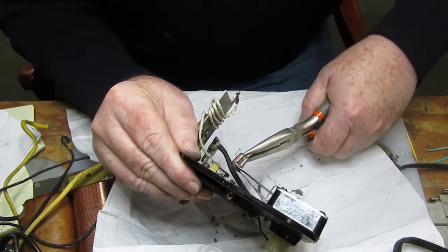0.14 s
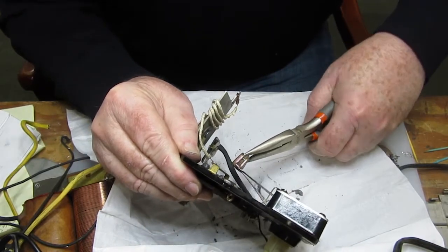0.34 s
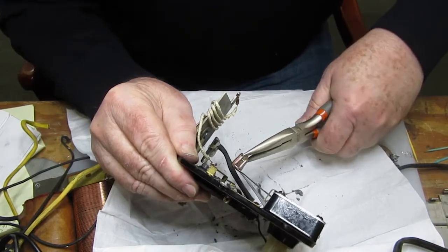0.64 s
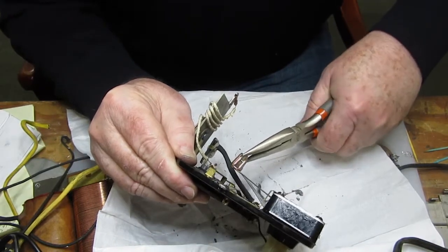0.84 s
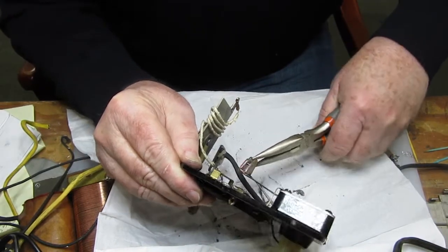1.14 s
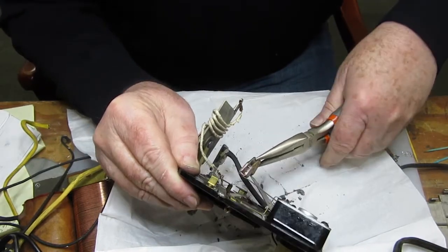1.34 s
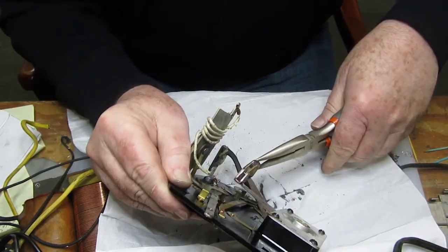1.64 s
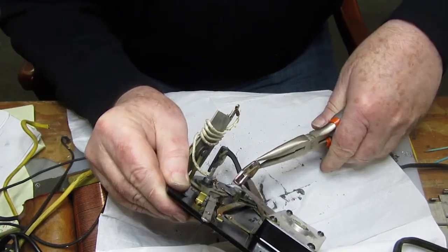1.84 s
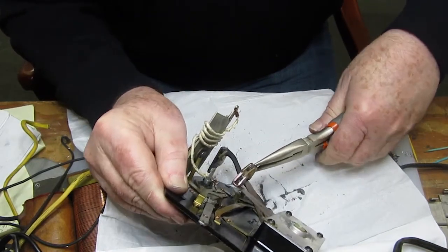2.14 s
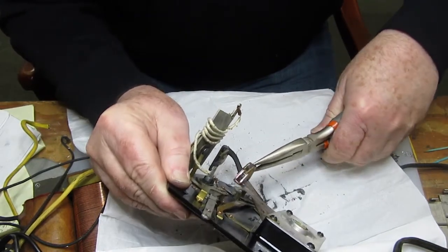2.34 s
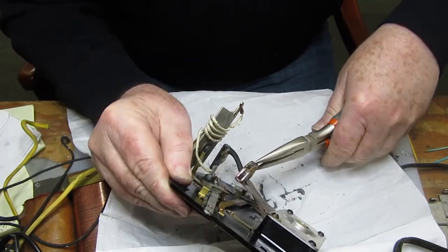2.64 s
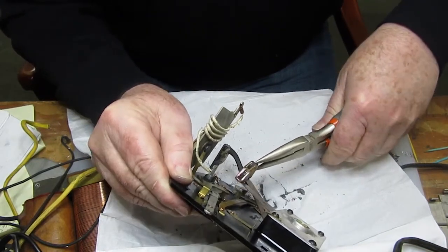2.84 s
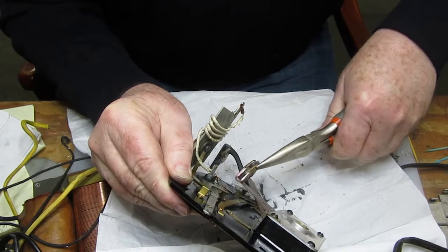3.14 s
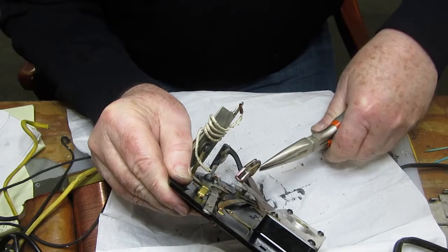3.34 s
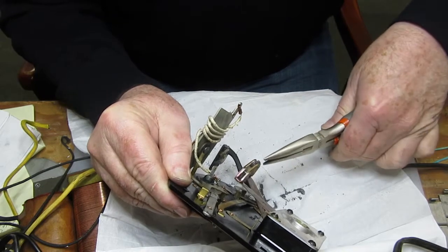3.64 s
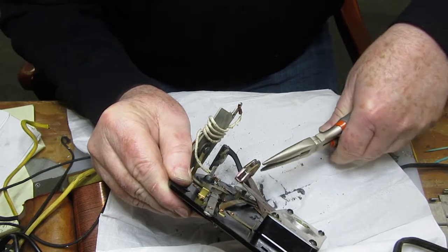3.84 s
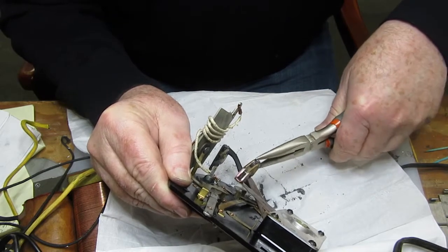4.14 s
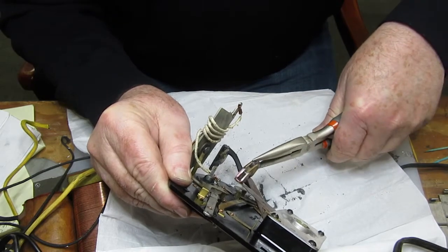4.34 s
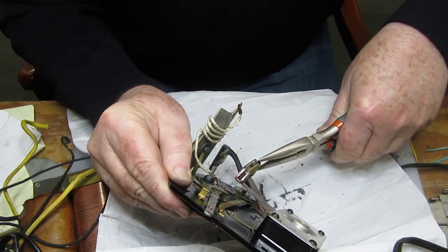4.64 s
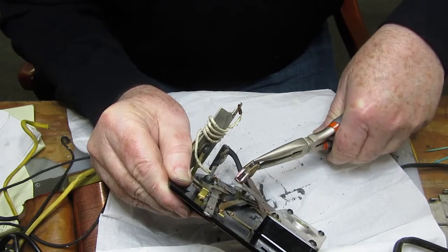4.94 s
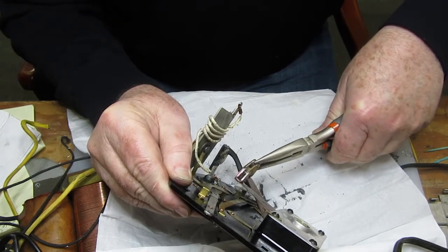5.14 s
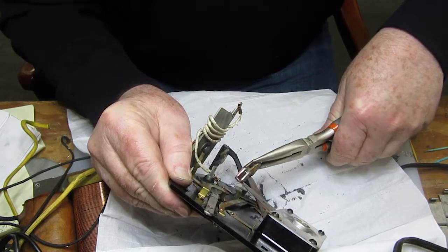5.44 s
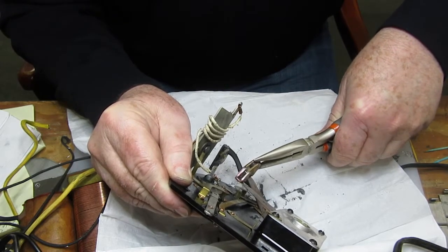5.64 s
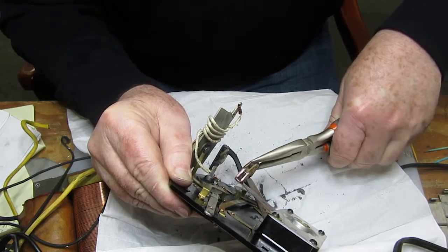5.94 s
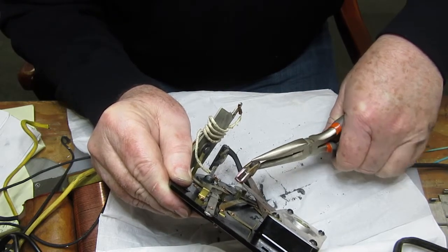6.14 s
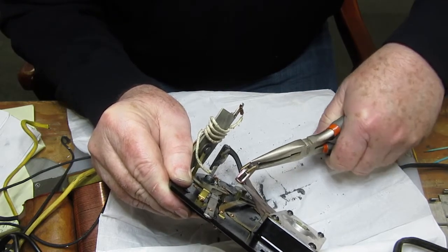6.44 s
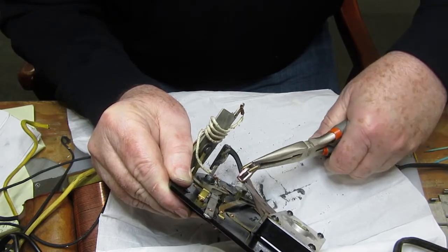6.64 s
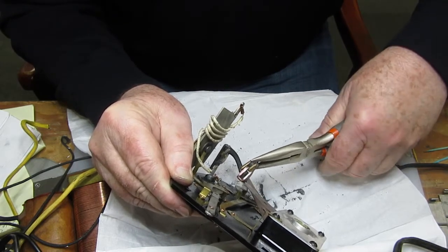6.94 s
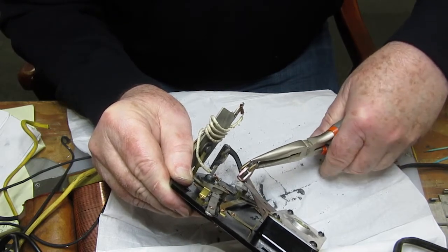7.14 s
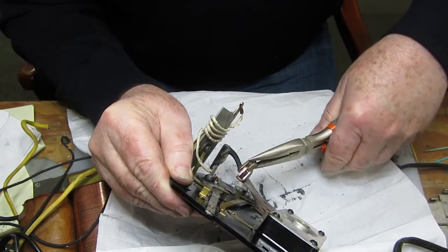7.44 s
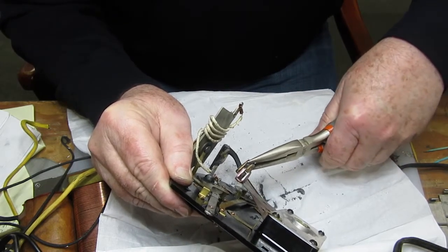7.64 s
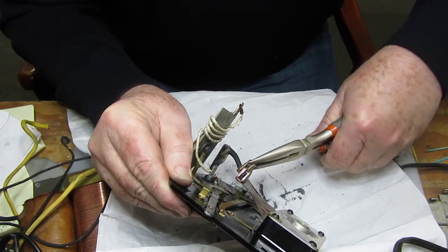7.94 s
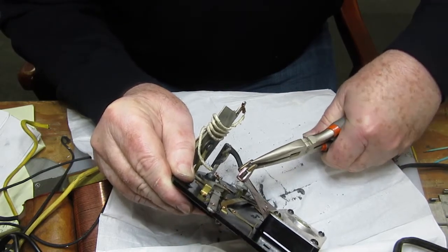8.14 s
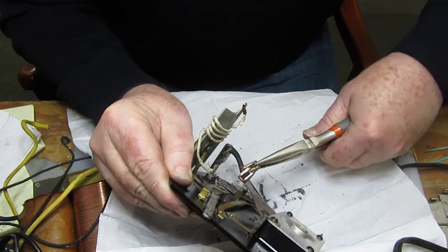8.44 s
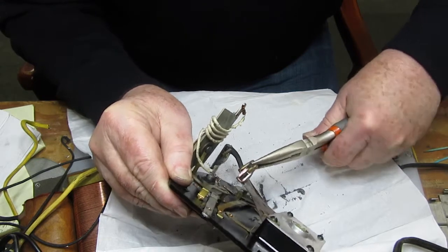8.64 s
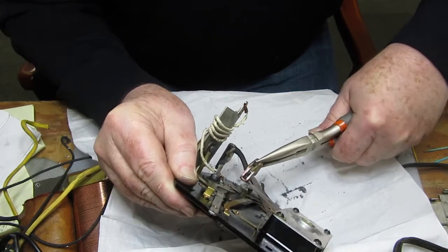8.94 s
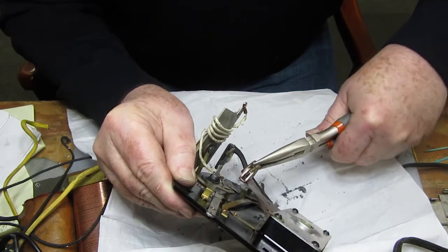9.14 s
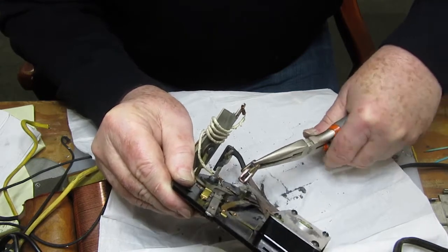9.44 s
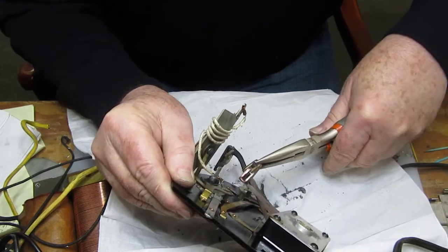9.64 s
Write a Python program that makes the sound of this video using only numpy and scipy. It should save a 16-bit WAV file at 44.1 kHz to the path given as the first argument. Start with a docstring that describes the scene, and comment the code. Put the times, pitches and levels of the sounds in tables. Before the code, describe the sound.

Close up at a workbench in a small room, needle-nose pliers break brittle graphite off a metal assembly with a sharp double crack and a brief metallic ring. The assembly scuffs on paper and the steel jaws click lightly. About three seconds in comes a second sharp snap with a quick run of clicks. Scattered bites, tiny crunches, finger rubs and soft knocks follow over a faint hum.

```python
"""Two sharp snaps, close up: needle-nose pliers crush a brittle graphite piece off a hand-held metal
assembly. Each break cracks and sets the holder, thin parts and a small spring ringing. The steel jaws
click and grind, crumbs tick, fingers rub, and the chassis knocks and scuffs on the workbench paper.
A faint hum fills the small room; the microphone overloads on the snaps and its gain control ducks."""
import sys
import numpy as np
from scipy import signal
from scipy.fft import rfft, irfft
from scipy.io import wavfile

SR = 44100
rng = np.random.default_rng(int(sys.argv[2]) if len(sys.argv) > 2 else 0)


def generate_wav(sig):
    """Save sig (samples, or channels by samples) to the path in sys.argv[1] as 16-bit PCM at SR."""
    pcm = np.round(np.clip(np.atleast_2d(sig).T, -1, 1) * 32767).astype(np.int16)
    wavfile.write(sys.argv[1], SR, pcm)


N = 432180

# The graphite breaking. Each row: start in seconds, level in dB, treble tilt in dB, pitch of the
# released holder in Hz, fade time of the crack in seconds.
BREAKS = [(0.1019, -12, -1, 2720, 0.0017), (0.1225, -11.5, -2, 2400, 0.0021),
          (3.1510, -27, 6, 2200, 0.0071), (3.1567, -13, 14, 2450, 0.0017)]
# The tone of the crack. Each row: frequency in Hz, gain in dB.
CRACK_EQ = [(100, -26.5), (350, -4), (800, -7), (1500, -6.5), (2400, 6), (3100, 3), (3450, -4), (4100, 2),
            (4700, -4), (5200, -1), (8000, -7.5), (9300, -4.5), (11000, -13.5), (15000, -17)]
# Thin metal parts ringing on. Each row: frequency in Hz, t60 in seconds, level in dB.
THIN_PART_MODES = [(1880, 0.069, 6), (4050, .12, -6)]
# Steel jaws biting. Each row: start in seconds, level in dB, treble in dB, knock into the chassis in dB,
# delay of a second slip in seconds (0 for none).
JAW_BITES = [(1.5664, -39.5, -9, -56, 0.00042), (1.6246, -35.5, -1, -41, .0137),
             (1.672, -34.5, -4, -56, 0.000044), (1.785, -40, -2.5, -58, .018), (1.932, -29, -1, -46, 0),
             (1.9537, -40.5, 1, -52, 0.00017), (3.1833, -23.5, -1, -38, .0048),
             (3.2105, -28, 1.5, -37, 0.000081), (3.2629, -40, 1, -55, 0.00021), (3.302, -25, 0, -47, .0127),
             (3.3277, -30, -1, -45, .0129), (3.392, -39, 1, -44, 0.001), (4.185, -41, -0.5, -48, 0),
             (5.16, -33, 0.5, -42, .0067), (5.182, -28, -1.5, -39.5, 0.00008), (5.4671, -31, -7, -41, 0),
             (5.4724, -20, -1, -39.5, 0.0018), (6.338, -38, -2.5, -56, .0043),
             (7.7344, -43, -11, -54, 0.00032), (8.397, -39, -9, -46, 0.00034),
             (8.4049, -31, -6.5, -44, 0.00023), (8.4701, -30, -15, -37, 0), (8.7295, -29, -8.5, -51, .0043),
             (8.8033, -30.5, -1, -52, .009), (9.4075, -22.5, -5, -30, .009)]
# The ring of jaws and holder. Each row: frequency in Hz, t60 in seconds, level in dB when gripping at
# the tip, level in dB when gripping deeper.
STEEL_MODES = [(1306, 0.029, -11.5, -10.5), (1530, 0.04, -12.5, -9.5), (1894, 0.045, -15, -15.5),
               (2760, 0.012, -18, -3), (3150, 0.058, -18, -26), (3640, 0.02, 3.5, 1.5), (3924, 0.024, 1, 4),
               (4073, 0.036, -2.5, 4), (4210, 0.03, 0, 5.5), (4510, 0.029, -8.5, -3.5),
               (5290, 0.027, -10, -10), (5850, 0.034, -12, -6.5), (7083, 0.018, 2, -0.5),
               (8020, 0.028, -11.5, -7), (8840, 0.015, -13, -1.5), (9300, 0.013, -2, 1.5),
               (10160, 0.017, -8, -13), (11900, 0.034, -17, -11.5), (12500, 0.023, -33.5, -27)]
# The jaw tips feeling for a grip. Each entry: start in seconds.
TIP_TOUCHES = [1.2012, 1.353, 1.693, 1.815, 4.2888, 5.845, 6.0488, 6.1367, 8.6555]
# Graphite crumbling in the jaws, dull and gritty. Each row: start in seconds, level in dB.
GRAPHITE_CRUMBLES = [(1.626, -44), (1.7437, -55), (1.939, -48.5), (2.667, -48.5), (3.2212, -42.5),
                     (3.239, -47.5), (4.3443, -52.5), (5.1775, -46.5), (5.2301, -48.5), (5.4575, -48),
                     (6.378, -52.5), (6.5021, -45), (6.508, -46), (6.6553, -56.5), (6.6888, -56),
                     (7.812, -49), (8.399, -47), (8.532, -56)]
# Jaws dragging across the graphite. Each row: start in seconds, length in seconds, level in dB.
JAW_DRAGS = [(3.17, 0.023, -31), (6.341, 0.034, -51), (8.829, 0.062, -42)]
# The body of the chassis on the bench. Each row: frequency in Hz, t60 in seconds, level in dB.
CHASSIS_BODY_MODES = [(103.7, 0.22, -0.5), (174.5, 0.2, -7.5), (260.7, .12, -1), (301.4, .09, -3),
                      (401, 0.045, -7.5), (535.4, .1, -10.5), (716, .05, -14.5), (860, 0.027, -14.5)]
# The chassis scuffing on paper. Each row: start in seconds, length in seconds, level in dB.
CHASSIS_SCUFFS = [(1.034, .12, -35), (1.067, .044, -28.5), (1.371, 0.046, -41.5), (1.614, 0.062, -39.5),
                  (3.16, .17, -46), (4.167, 0.24, -54), (8.606, 0.08, -48.5), (8.681, .049, -33),
                  (8.833, 0.066, -26), (9.383, 0.081, -43), (9.695, 0.02, -43.5)]
# The tone of the paper's rasp. Each row: frequency in Hz, gain in dB.
PAPER_EQ = [(200, 8), (700, 3), (1700, 5), (2800, -5), (4400, -4), (6000, -8.5), (12000, -17.5),
            (15000, -29.5)]
# Fingers and jaws shifting their grip. Each row: start in seconds, length in seconds, level in dB.
GRIP_RUBS = [(0.436, 0.095, -56.5), (1.169, .11, -58.5), (1.517, 0.081, -51.5), (3.487, 0.044, -53.5),
             (3.749, 0.073, -59), (6.86, 0.087, -56), (7.602, 0.093, -60), (9.458, .16, -59)]
# The tone of room air and microphone hiss. Each row: frequency in Hz, gain in dB.
AIR_EQ = [(12, -28), (20, -11), (43, -6.5), (87, -15), (124, -1), (147, -11.5), (199, -14), (398, -18),
          (433, -22.5), (525, -19.5), (638, -22.5), (1210, -19.5), (1420, -25.5), (9370, -37), (15000, -48)]
# A distant fan's resonances. Each row: frequency in Hz, t60 in seconds, level in dB.
DISTANT_FAN_MODES = [(410, 1, -8.5), (902, 0.069, 6), (1000, .08, -21), (1240, 0.1, -3), (9500, 0.0065, 4)]
# Brief swells in the mains hum. Each row: time of the peak in seconds, rise in dB.
MAINS_SWELLS = [(3.62, 14), (6.92, 13.5)]
# The fader curve of the low rumble. Each row: time in seconds, level in dB.
RUMBLE_FADER = [(3.8, -60), (5.4, -49), (9.8, -52)]

TOP_HZ = 15300
GRIP_DEEPER_S = 7.0  # from here on the jaws grip deeper


def snaps(swing_s=0.00069, holder_db=-4, thin_db=-20, spring_db=-27, let_go_s=3.392, let_go_db=-35):
    """Each break is a broad crack; the freed holder swings a few cycles; thin parts and spring ring on."""
    out, t = np.zeros(N), seconds(.03)
    thin_parts = hit_level(ring(THIN_PART_MODES, .3))
    for start, db, tilt_db, holder_hz, crack_s in BREAKS:
        crack = colour(fracture(.03, crack_s), CRACK_EQ)
        crack = colour(crack, [(3000, 0), (12000, tilt_db)])
        holder = t * np.exp(-t / swing_s) * np.sin(2 * np.pi * holder_hz * t)
        add(out, start, undb(db) * hit_level(crack))
        add(out, start, undb(db + holder_db) * hit_level(holder))
        add(out, start, undb(db + thin_db) * thin_parts)
        add(out, start, undb(db + spring_db) * spring())
    add(out, let_go_s, undb(let_go_db) * thin_parts)  # they ring freely as the pliers slip off
    return out


def fracture(length, fade_s):
    """A running crack, spread over a moment but evened out in spectrum; a slow one also builds slowly."""
    crackle = burst(length, fade_s, rise_s=.2 * fade_s)
    spectrum = rfft(crackle, 4 * len(crackle))
    return irfft(spectrum / np.abs(spectrum) ** .7)[:len(crackle)]


def spring(low_hz=2100, high_hz=3150, centre_hz=2430, width_hz=330, t60=0.67, count=36):
    """A small coil spring: many close modes that shimmer together."""
    scatter_hz = (high_hz - low_hz) / count * rng.uniform(-0.61, 0.54, count)
    hz = np.linspace(low_hz, high_hz, count) + scatter_hz
    db = -10 * np.log10(1 + ((hz - centre_hz) / width_hz) ** 2)
    t = seconds(0.47)
    partials = np.sin(2 * np.pi * (hz[:, None] * t + rng.random((count, 1))))
    return hit_level(undb(db) @ partials * undb(-60 * t / t60))


def pliers(touch_db=-48, crumb_db=-62, crumb_range_db=8, crumb_count=40):
    """The jaws at work: bites, light touches, crumbles, gritty drags and faint crumbs giving way."""
    out = np.zeros(N)
    for start, db, body_db, treble_db, _ in jaw_slips():
        add(out, start, undb(db) * bite(start, body_db, treble_db))
    for start in TIP_TOUCHES:
        add(out, start, undb(touch_db) * bite(start, body_db=5, treble_db=-3.5))
    for start, db in GRAPHITE_CRUMBLES:
        crunch = bite(start, body_db=16.5, treble_db=-8, grind=1.6, grind_s=0.0034, grit=0.42)
        add(out, start, undb(db) * crunch)
    for start, length, db in JAW_DRAGS:
        grains = rng.standard_normal(len(seconds(length))) ** 3
        add(out, start, undb(db) * unit_rms(band(grains, 3400, 5400)))
    for position, size in rng.random((crumb_count, 2)):
        tick = band(burst(0.022, fade_s=0.0033), 1000, 5700)
        add(out, position * N / SR, undb(crumb_db + crumb_range_db * size) * hit_level(tick))
    return out


def jaw_slips(firm_db=-29.5, firm_body_db=3, body_slope=0.1249, second_db=-3.5):
    """Yield each slip's start, level, body, treble and knock; lighter bites have more dull body."""
    for start, db, treble_db, knock_db, delay in JAW_BITES:
        body_db = firm_body_db + body_slope * (firm_db - db)
        yield start, db, body_db, treble_db, knock_db
        if delay > 0:  # a second slip spends what force is left
            body_db -= body_slope * second_db
            yield start + delay, db + second_db, body_db, treble_db, knock_db + second_db


def bite(start, body_db, treble_db, grind=0.68, grind_s=0.0024, grit=0.22):
    """One slip of the jaws: a sharp push and a little grinding ring the steel; a deep grip damps it."""
    hz, t60, tip_db, deep_db = np.transpose(STEEL_MODES)
    sustain, mode_db = (0.65, deep_db) if start > GRIP_DEEPER_S else (1, tip_db)
    hz = hz * (1 + 0.01 * rng.standard_normal(len(hz)))  # the contact point shifts with each slip
    steel = ring(zip(hz, t60 * sustain, mode_db), .1)
    fade_s = sustain * grind_s * undb(rng.uniform(-.5, .5))
    grinding = burst(.1, fade_s, rise_s=0.00074)
    push = signal.unit_impulse(len(grinding)) + grind * grinding / np.linalg.norm(grinding)
    graphite = grit * undb(0.19 * body_db) * hit_level(band(grinding, 660, TOP_HZ))  # dull is grittier
    click = hit_level(signal.fftconvolve(push, steel)[:len(push)]) + graphite
    click = colour(click, [(2700, body_db), (3500, 0.015), (4600, 0.0033), (6200, treble_db)])
    main_ring = band(click, 3300, 5000)  # the main jaw resonances set the level
    return click * np.sqrt(SR / 100) / np.linalg.norm(main_ring)


def chassis(knock_trim_db=1, crumble_share_db=3.5, snap_share_db=-21, creep_s=.08, creep_db=-18):
    """Bites, crumbles and breaks jolt the chassis's low modes; it scuffs, then creeps on a little."""
    out, body = np.zeros(N), ring(CHASSIS_BODY_MODES, 0.23)
    body = band(band(body, 85, TOP_HZ), 85, TOP_HZ)
    knocks = [(start, db) for start, *_, db in jaw_slips()]
    knocks += [(start, db + crumble_share_db) for start, db in GRAPHITE_CRUMBLES]
    knocks += [(start, db + snap_share_db) for start, db, *_ in BREAKS]
    for start, db in knocks:
        contact = band(fracture(0.023, fade_s=0.0039), 110, 3000)
        add(out, start, undb(db + knock_trim_db) * hit_level(signal.fftconvolve(contact, body)))
    creeps = [(start + length, creep_s, db + creep_db) for start, length, db in CHASSIS_SCUFFS]
    for start, length, db in [*CHASSIS_SCUFFS, *creeps]:
        add(out, start, scuff(body, length, db))
    return out


def scuff(body, length, db, slips_per_s=700, friction=0.61, rasp=0.81, middling_db=-39.5):
    """Stick-slip on the paper: the chassis body thrums and the paper hisses along."""
    t, slip_chance = seconds(length), slips_per_s / SR
    swell = np.sin(np.pi * (t / length) ** 0.44) ** 0.25
    slips = (rng.random(len(t)) < slip_chance) * np.sign(rng.standard_normal(len(t)))
    force = swell * (slips / np.sqrt(slip_chance) + friction * rng.standard_normal(len(t)))
    thrum = signal.fftconvolve(force, body)
    out = undb(db) * thrum * np.sqrt(len(t) / np.sum(thrum ** 2))
    hiss = colour(rasp * force + swell * rng.standard_normal(len(t)), PAPER_EQ)
    hiss_db = -47.5 + 0.59 * (db - middling_db)  # hiss grows more slowly than thrum
    out[:len(t)] += undb(hiss_db) * unit_rms(hiss)
    return out


def rubs():
    """A light dry rasp of tiny grains that swells and fades with each shift of the grip."""
    out = np.zeros(N)
    for start, length, db in GRIP_RUBS:
        t = seconds(length)
        noise = rng.standard_normal(len(t))
        grains = band(noise * np.abs(noise), 1500, 9000)
        swell = np.sqrt(np.sin(np.pi * t / length))
        add(out, start, undb(db) * unit_rms(grains * swell))
    return out


def room(direct, early_db=-17, early_t60=0.079, late_db=-27, late_t60=0.24, predelay_s=.004):
    """Quick reflections off bench and hands, then the short, darker tail of the workshop."""
    t, echo = seconds(.5), 0
    for db, t60, top_hz in (early_db, early_t60, 12000), (late_db, late_t60, 7700):
        tail = rng.standard_normal(len(t)) * undb(-60 * t / t60) * (t > predelay_s)
        tail = band(tail, 90, top_hz)
        echo += undb(db) * tail / np.linalg.norm(tail)
    return direct + signal.fftconvolve(direct, echo)[:N]


def room_tone(air_db=-52.5, fan_db=-63, hum_hz=120, hum_db=-55.5, swell_s=0.1):
    """The bed: air and microphone hiss, a distant fan, mains hum that swells twice, a narrow rumble."""
    t = np.arange(N) / SR
    air = colour(rng.standard_normal(N), AIR_EQ, size=4096)
    air *= undb(air_db) / np.std(band(air, 200, 15000))
    fan = signal.fftconvolve(rng.standard_normal(N), ring(DISTANT_FAN_MODES, 0.36), "same")
    swell_db = sum(db * np.exp(-((t - peak) / swell_s) ** 2) for peak, db in MAINS_SWELLS)
    hum = undb(hum_db + swell_db) * np.sin(2 * np.pi * hum_hz * t)
    rumble_db = np.interp(t, *np.transpose(RUMBLE_FADER))
    rumble = undb(rumble_db) * unit_rms(band(rng.standard_normal(N), 30.9, 37))
    return air + undb(fan_db) * unit_rms(fan) + hum + rumble


def burst(length, fade_s, rise_s=0.00018):
    """A run of micro-fractures that builds quickly and dies away."""
    t = seconds(length)
    return rng.standard_normal(len(t)) * np.exp(-t / fade_s) * (1 - np.exp(-t / rise_s))


def ring(modes, length):
    """The ring of struck modes, each given as Hz, t60 and dB; neighbours move in opposite directions."""
    t = seconds(length)
    return sum((-1) ** k * undb(db - 60 * t / t60) * np.sin(2 * np.pi * hz * t)
               for k, (hz, t60, db) in enumerate(modes))


def colour(x, points, size=1024):
    """Minimum-phase EQ through points of Hz and dB, so nothing rings ahead of an attack."""
    hz, db = np.transpose(points)
    bin_hz = np.arange(size + 1) * SR / 2 / size
    gain = undb(np.interp(np.log(bin_hz + 1), np.log(hz), db))
    cepstrum = irfft(np.log(gain))
    cepstrum[1:size] *= 2
    cepstrum[size + 1:] = 0
    impulse = irfft(np.exp(rfft(cepstrum)))[:size]
    return signal.fftconvolve(x, impulse)[:len(x)]


def band(x, low_hz, high_hz):
    """Band-pass."""
    return signal.sosfilt(signal.butter(2, [low_hz, high_hz], "band", fs=SR, output="sos"), x)


def hit_level(x):
    """Scale a short sound to the energy of 10 ms at rms 1."""
    return x / np.sqrt(np.sum(x ** 2) / (SR / 100))


def unit_rms(x):
    """Scale to rms 1."""
    return x / np.sqrt(np.mean(x ** 2))


def undb(db):
    """Decibels to gain."""
    return 10 ** (np.asarray(db) / 20)


def seconds(length):
    """Time axis in seconds."""
    return np.arange(int(length * SR)) / SR


def add(track, start, sound):
    """Drop a sound onto the track at a start in seconds."""
    first = int(start * SR)
    track[first:first + len(sound)] += sound[:max(N - first, 0)]


def scene():
    """The mono mix: everything on the bench, in the room, over the room tone."""
    bench = pliers() + snaps() + chassis() + rubs()
    return (room(bench) + room_tone())[None]


def record(dry, threshold_db=-5.5, release_db_per_s=3.5, attack_s=0.015):
    """The snaps clip; gain control ducks just after them and creeps back; the very top is cut."""
    level_db = 20 * np.log10(np.clip(np.abs(dry[0]), 1e-9, 1))
    over_db = np.maximum(level_db - threshold_db, 0)
    release_db = release_db_per_s * np.arange(N) / SR
    held_db = np.maximum.accumulate(over_db + release_db) - release_db
    step = 1 / (attack_s * SR)
    duck_db = signal.lfilter([step], [1, step - 1], held_db)
    clipped = np.clip(dry * undb(-duck_db), -1, 1)
    return signal.sosfilt(signal.ellip(10, .2, 90, TOP_HZ, fs=SR, output="sos"), clipped)


dry = scene()
out = record(dry)
generate_wav(out)
```